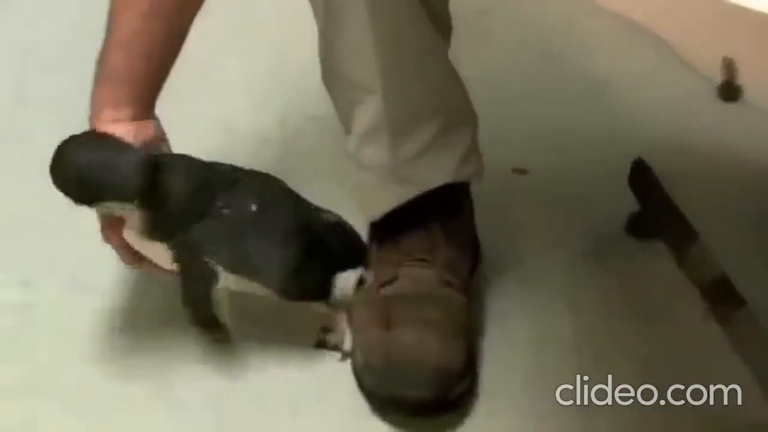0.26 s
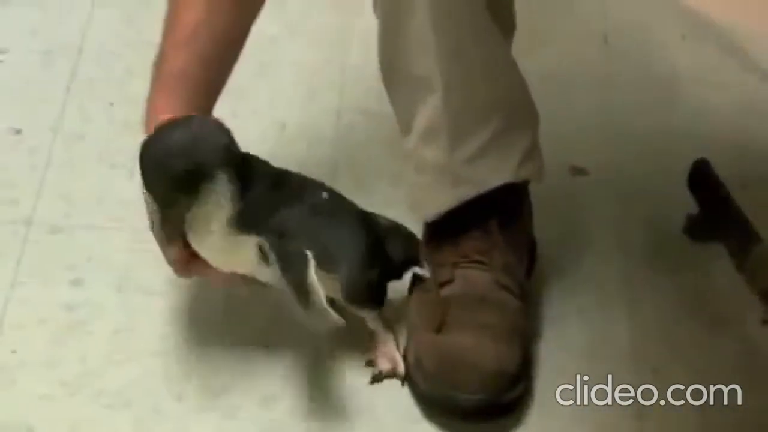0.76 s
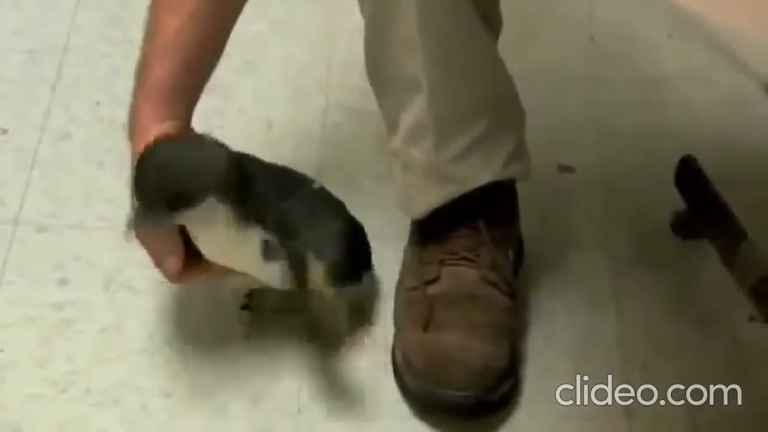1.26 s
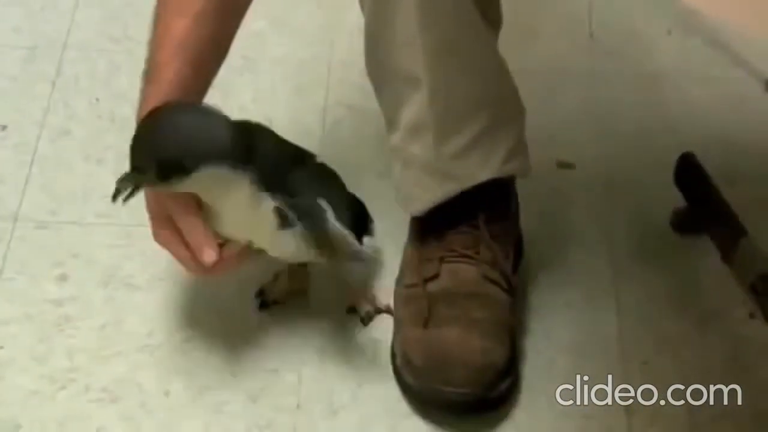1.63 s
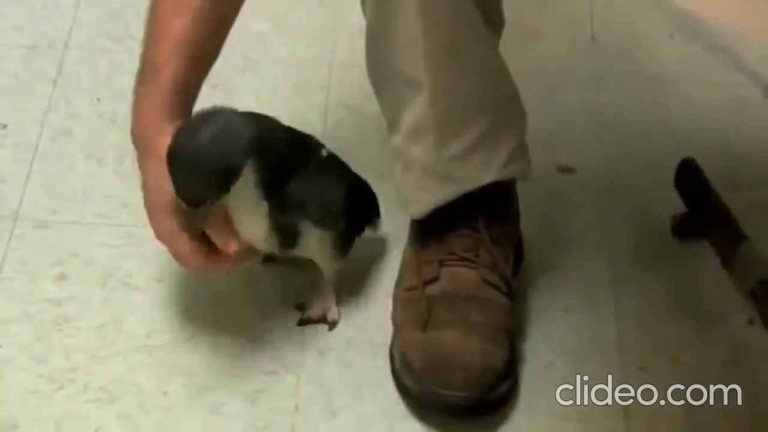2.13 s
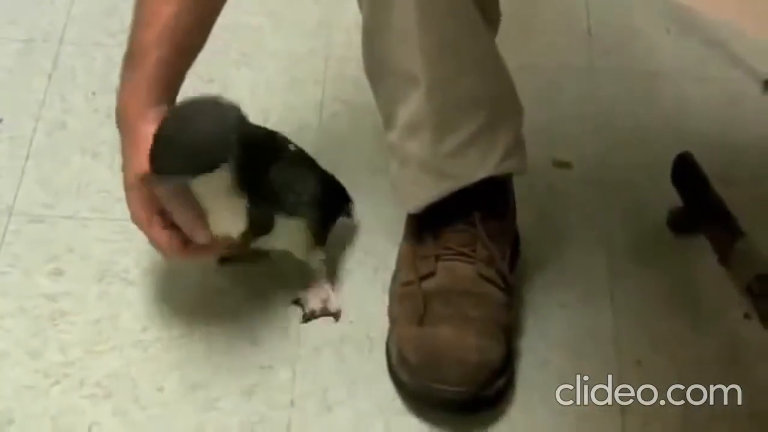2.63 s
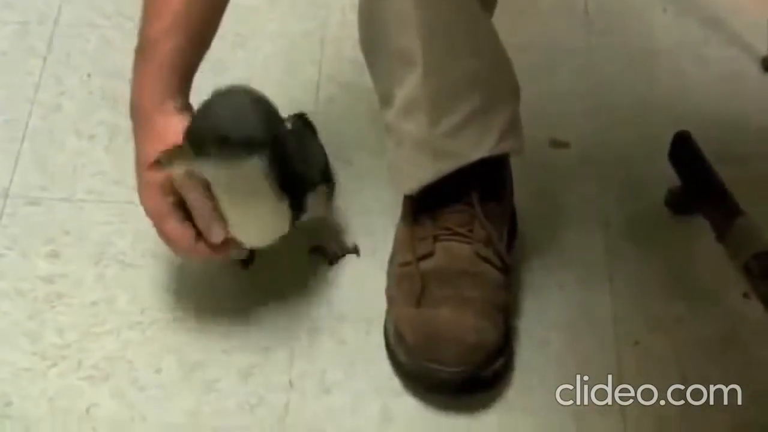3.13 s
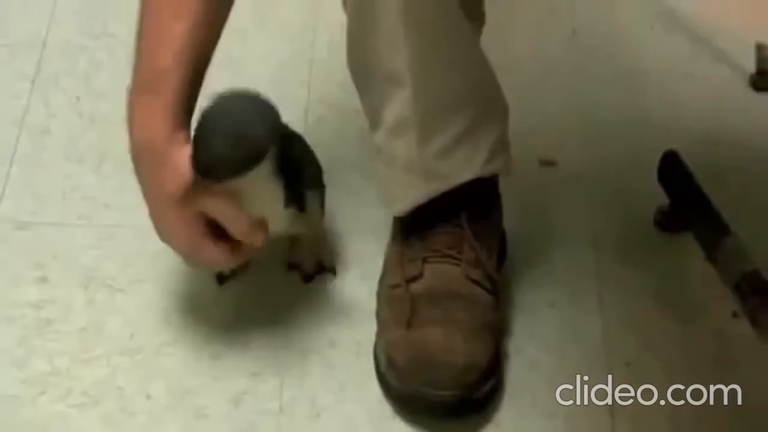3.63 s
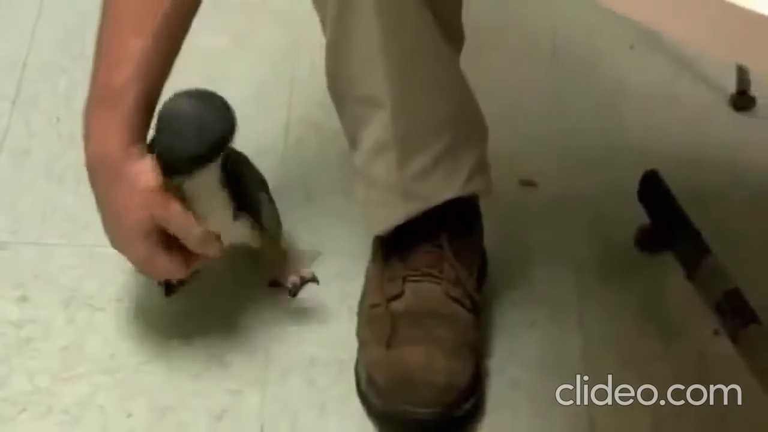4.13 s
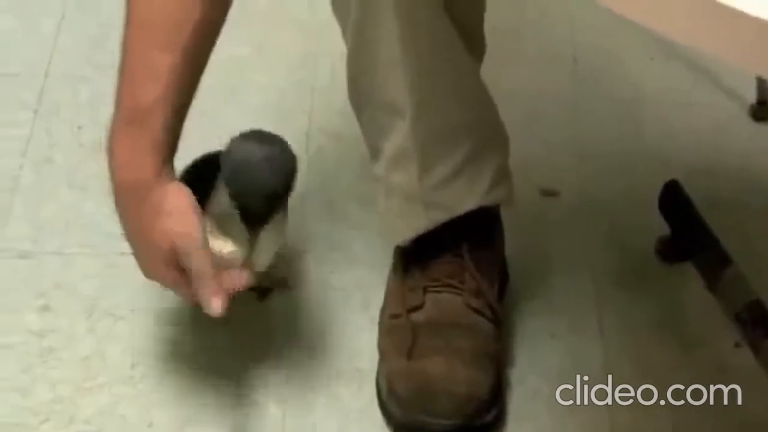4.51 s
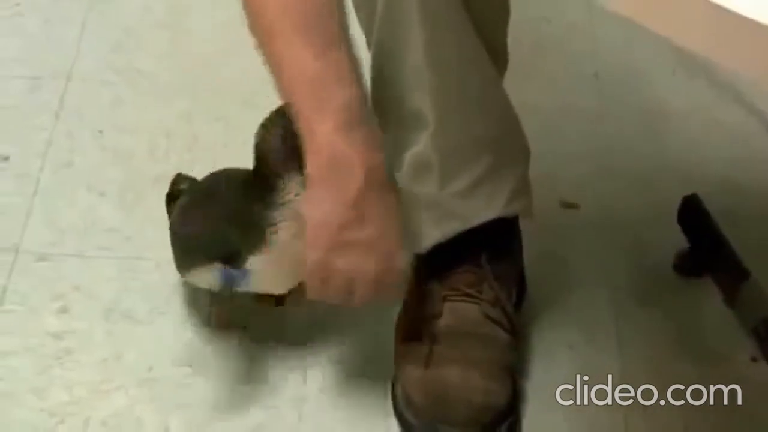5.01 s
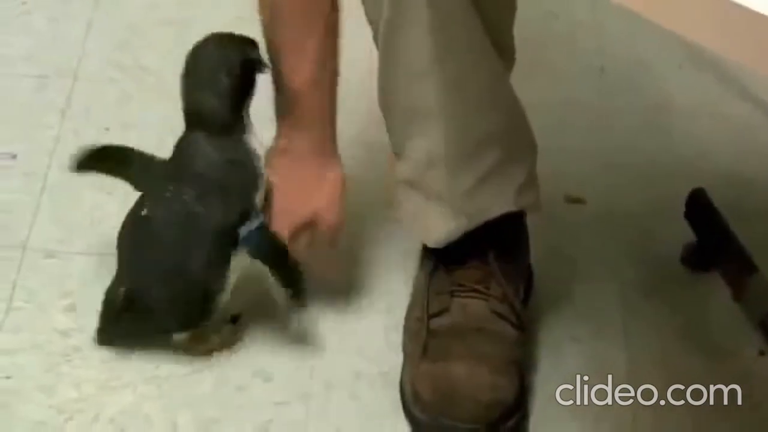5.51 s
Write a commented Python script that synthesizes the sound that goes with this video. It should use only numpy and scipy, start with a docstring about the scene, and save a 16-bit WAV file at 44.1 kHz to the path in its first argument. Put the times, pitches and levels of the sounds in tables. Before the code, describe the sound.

One small penguin brays close to a stereo microphone in a quiet, reverberant room with a hard floor. It begins at once on a loud, whistling squeal around 1300 Hz, fading by 0.25 s. From 0.2 to 1.8 s a hoarse growl swells and rises from about 290 to 450 Hz, then sinks, fluttering rapidly, with rasping hiss and brief brighter flares. Low, rough catches at 1.8 s break upward into a piercing squeal until 2.6 s, crossed by tiny higher whistled chips. A steadier growl near 380 Hz runs from 2.7 to 4.4 s. Another low catch leads to a wavering squeal, 4.5 to 5.05 s, sliding down at its end. From 5.1 s a weak, breathy growl stirs, then swells until the abrupt cut near 5.75 s. Faint floor ticks fall around 0.5, 1.1 and 5.35 s. Low ventilation rumble continues throughout, ducked by gain control around the loud calls.

```python
"""A small penguin brays close by on a hard floor in a quiet, echoing room.
It opens on a held squeal, then growls and squeals by turns, ending on a growl that swells until the cut.
Growls are fluttering, frayed partials with hiss; squeals a strong whistled fundamental with weak overtones.
Short low catches lead into the later squeals, whistled chips cut across the calls and the floor ticks.
Ventilation rumble lies under it all; gain control ducks everything around the loud calls.
"""
import sys
import numpy as np
from scipy import signal
from scipy.fft import rfft, irfft
from scipy.io import wavfile
from scipy.ndimage import uniform_filter1d

SR = 44100
rng = np.random.default_rng(int(sys.argv[2]) if len(sys.argv) > 2 else 0)


def pcm_store(signal):
    """Save signal as 16-bit PCM."""
    levels = np.round(np.clip(np.atleast_2d(signal), -1, 1) * 32767)
    wavfile.write(sys.argv[1], SR, levels.astype(np.int16).T)


N = 254016

# One curve an out-breath: [t/s, effort level/dB, pitch f/Hz]
GROWL_CURVES = [
    [(0.2, -56, 290.1), (0.27, -37.5, 283.7), (0.44, -33.5, 301.3), (0.47, -24.5, 299.1),
     (0.66, -24.5, 348.5), (0.83, -21.5, 364.2), (0.944, -22.5, 416), (1.08, -19, 398.2),
     (1.24, -19, 458.3), (1.5, -17.5, 411.5), (1.68, -23.5, 390.1), (1.744, -27.5, 342.7),
     (1.79, -42.5, 338.6)],
    [(2.66, -51, 259.1), (2.7, -38.5, 270.3), (2.8, -29.5, 335.8), (2.92, -24.5, 374.5), (3.1, -22, 390.8),
     (3.26, -19, 399.3), (3.38, -21.5, 391.5), (3.62, -21.5, 378.8), (3.77, -19.5, 389.9),
     (4.2, -22.5, 372.8), (4.33, -28.5, 360.1), (4.42, -52, 322.2)],
    [(5.12, -65, 298.3), (5.23, -45, 304.3), (5.3, -40, 303.8), (5.46, -39, 308.7), (5.535, -45.5, 293.8),
     (5.55, -35.5, 304.1), (5.62, -31.5, 322.7), (5.72, -25, 333.5), (5.76, -22.5, 342.4)],
]
# One row an out-breath: [mean flutter f/Hz, body shake f/Hz, t/s of a shake peak]
GROWL_FLUTTERS = [(46, 10.134, 1.45), (44.12, 15, 4.7), (33.99, 11, 5.69)]
# Throat resonances that shape the growl: [f/Hz, relative level/dB]
GROWL_THROAT = [(200, -17), (300, 3.5), (420, -1.5), (580, -3.5), (780, 2.5), (1000, -7), (1250, -4),
                (1700, -16.5), (2200, -26.5), (3000, -51.5), (4500, -57.5)]
# A higher growl is pressed harder: its upper partials gain level around a middle pitch
MIDDLE_HZ, UPPER_DB, UPPER_DB_PER_OCTAVE = 400, -1.5, 40
THROB, THROB_PITCH = .62, .02  # flutter depth in level (0-1) and as a share of pitch
WEAK_BELOW_DB, WEAK_WOBBLE = -22, .003  # share of pitch wobble added per dB of effort below this


def growl(rows, hiss_rows, flutter_hz, shake_hz, shake_s):
    """Unsteady membranes: throbbing partials on a fluttering pitch, and air puffing through each cycle."""
    t, (effort_db, hz) = curves(rows)
    n = len(t)
    upper_db = UPPER_DB + UPPER_DB_PER_OCTAVE * np.log2(hz / MIDDLE_HZ) + flares(t)
    lost_db = np.maximum(WEAK_BELOW_DB - effort_db, 0)

    beat = np.cumsum(flutter_hz * (1 + 0.1212 * wander(n, 7.744))) / SR  # a slow flutter chops the growl
    hz = (hz + flares(t, 3)) * (1 + THROB_PITCH * np.sin(2 * np.pi * beat))
    slow_wobble = (.011 + WEAK_WOBBLE * lost_db) * wander(n, 25.)
    fast_wobble = .005 * wander(n, 100.)
    turns = np.cumsum(hz * (1 + slow_wobble + fast_wobble)) / SR

    tone = np.zeros(n)
    weak_fray = .05 * np.minimum(lost_db, 12)  # a weak growl frays more
    for k in range(1, 9):
        upper_share = np.clip((k * hz - 500.) / 701.0, 0, 1)
        level = gain_of(read(GROWL_THROAT, k * hz) + upper_db * upper_share)
        # each partial frays into a band, higher ones more
        fray = frayed(n, .3 + .14 * k + weak_fray, 22. + 12 * k)
        # each partial peaks at its own point of the beat
        throbs = 1 + THROB * np.cos(2 * np.pi * (beat + .3 * k))
        partial = fray * np.exp(2j * np.pi * (k * turns + rng.random()))
        tone += level * throbs * partial.real

    puffs = (1.7 + np.exp(-(turns % 1) / 0.58)) * rng.standard_normal(n)
    breath = evened(coloured(puffs, GROWL_THROAT))
    # a weak growl is breathier
    voice = evened(tone) + gain_of(-14 - 0.6 * (effort_db + 20.5)) * breath
    voice = signal.sosfilt(signal.butter(3, 180., "high", fs=SR, output="sos"), voice)
    call = gain_of(effort_db) * voice + rasp(t, puffs, hiss_rows, shake_hz, shake_s)
    return t[0], call * signal.windows.tukey(n, .03)


# The beak opens for a moment and the growl flares brighter and higher:
# [t/s, length/s, lift of the upper partials level/dB, pitch lift f/Hz]
BEAK_FLARES = [(0.662, 0.0335, 16.5, 22.5), (0.854, 0.0585, 7, 22.17), (0.946, 0.0628, 12.5, 9.33),
               (1.196, 0.0356, 2.5, 21.12), (1.556, 0.068, 6.5, 8.4), (1.542, 0.032, 2.5, 24),
               (1.632, 0.0642, 10, 2.85), (3.149, 0.0784, 2.5, 8.57), (3.228, 0.0394, 3.5, 14.4),
               (3.411, 0.1338, 6.5, 4), (3.761, 0.049, 2.5, 20.2), (3.961, 0.081, 5, 14.23),
               (4.127, 0.0517, 5, 2.39)]


def flares(t, column=2):
    """Each opening lifts brightness (column 2) or pitch (column 3) in a smooth bump; overlaps add."""
    return sum(row[column] * np.exp(-((t - row[0]) / (row[1] / 2)) ** 2) for row in BEAK_FLARES)


# One curve an out-breath, nominal band levels: [t/s, low band level/dB, middle level/dB, upper level/dB]
RASP_CURVES = [
    [(0.26, -63.5, -71, -62), (0.335, -66.5, -70, -66), (0.378, -52.5, -59.5, -53),
     (0.44, -63.5, -64.5, -60.5), (0.468, -56, -57.5, -53), (0.588, -49, -50, -47),
     (0.914, -60, -51, -51.5), (0.932, -56, -54, -41.5), (1.092, -55.5, -48, -49.5),
     (1.11, -45, -45.5, -43), (1.204, -57, -46, -37), (1.406, -48, -44, -42), (1.444, -50, -42, -37),
     (1.742, -57, -51.5, -51), (1.78, -70, -56.5, -50.5)],
    [(2.75, -63.5, -66, -61), (2.802, -48, -51.5, -52.5), (2.826, -52.5, -61, -57.5),
     (2.95, -57.5, -54, -56.5), (3.112, -51.5, -48.5, -46), (3.548, -50, -43, -52.5),
     (3.606, -53.5, -47, -60.5), (3.758, -49.5, -43, -52), (4.046, -56.5, -47, -48),
     (4.346, -63.5, -62.5, -58.5), (4.36, -74.5, -79.5, -69)],
    [(5.5, -80, -75.5, -78.5), (5.535, -78, -76, -77), (5.556, -80, -57.5, -68.5), (5.586, -63.5, -57, -68),
     (5.624, -64.5, -58, -61), (5.664, -65.5, -55, -64), (5.75, -61, -61, -55.5)],
]
# One row a band: [lower edge f/Hz, upper edge f/Hz]
RASP_BANDS = [(2000, 4800), (4800, 6250), (6250, 9900)]
# Colour of rushing air, in the rasp and in the squeal: [f/Hz, relative level/dB per Hz]
HISS_COLOUR = [(2000, -1.5), (3000, -12), (4500, -11.5), (4900, -16), (5500, -5.5), (6100, -10), (6900, -4),
               (7600, -4.5), (8300, -6), (8900, -17.5), (9800, -47.5)]
SHAKE_DB = 2.2  # body shake on the hiss, either way


def rasp(t, puffs, rows, shake_hz, shake_s):
    """Puffed air hisses in three bands that swell apart; the beating flippers shake the airflow."""
    s, *levels_db = np.transpose(rows)
    hiss, out = coloured(puffs, HISS_COLOUR), 0
    shake_db = SHAKE_DB * np.cos(2 * np.pi * shake_hz * (t - shake_s))
    for edges, db in zip(RASP_BANDS, levels_db):
        band_filter = signal.butter(4, edges, "band", fs=SR, output="sos")
        band = evened(signal.sosfilt(band_filter, hiss))
        flicker_db = 2.76 * wander(len(t), 32.0) - 2.0
        out = out + band * gain_of(np.interp(t, s, db, left=-75) + shake_db + flicker_db)
    return out


# One curve a held squeal:
# [t/s, effort level/dB, pitch f/Hz, high overtones over effort level/dB before a 7 dB cut]
SQUEAL_CURVES = [
    [(0.0, -8, 1376, -24), (0.042, -13.5, 1293, -28.5), (0.084, -18.5, 1386, -18), (0.1, -7, 1363, -31.5),
     (0.125, -23.5, 1312, -14.5), (0.145, -16, 1300, -25), (0.175, -22, 1222, -26),
     (0.19, -29.5, 1295, -24), (0.21, -27, 1296, -25.5), (0.24, -42.5, 1310, -24)],
    [(1.878, -12, 1291, -30), (1.905, -10.5, 1305, -16.5), (1.946, -10, 1303, -11.5),
     (2.01, -8.5, 1352, -18), (2.06, -10, 1374, -24.5), (2.13, -7, 1361, -26.5), (2.222, -14, 1424, -24.5),
     (2.25, -29, 1403, -12.5), (2.29, -9, 1392, -33), (2.42, -10, 1311, -28), (2.524, -11, 1241, -36),
     (2.555, -17, 1119, -20.5), (2.6, -35.5, 1205, -20.5)],
    [(4.487, -8, 1256, -26), (4.547, -12, 1101, -30), (4.607, -8.5, 1293, -19), (4.635, -7.5, 1160, -43),
     (4.693, -8, 1336, -19.5), (4.765, -7.5, 1240, -28), (4.798, -16, 1330, -12),
     (4.83, -11.5, 1305, -19.5), (4.845, -8, 1242, -24.5), (4.91, -8, 1218, -33.5),
     (4.977, -12, 1123, -41.5), (5.06, -38.5, 1106, -19.5)],
]
# One row a held squeal: [upper throat resonance from f/Hz, to f/Hz,
# low overtones over effort level/dB, roughness from (0-1), roughness to (0-1)]
SQUEAL_COLOURS = [(8450, 7050, -16, 0.7, 0.76), (5120, 6973, -24.5, 0.6, 0.42),
                  (6900, 7070, -23, 0.55, 0.3)]
# Throat resonances that shape the overtones: [f/Hz, level/dB]
SQUEAL_THROAT = [(1500, 9.5), (2500, -5.5), (3300, -14), (3800, -18), (4200, -15), (4600, -13.5),
                 (5300, -0.5), (6500, -5.5), (8000, -3.5), (9500, -11.5)]
RING_GLIDE_S = 0.2117  # the resonance and the roughness settle over this time
TEAR, TEAR_HZ = .55, 80  # how far and how fast roughness tears the overtones
EDGE_HZ = 9950  # top of the audible band, for the overtones and for the final band limit


def squeal(rows, ring_from_hz, ring_to_hz, low_db, rough_from, rough_to, tight_db=0):
    """A taut membrane whistles a strong fundamental; weak overtones ring in the upper throat."""
    t, (effort_db, hz, high_db) = curves(rows)
    n = len(t)
    settled = np.clip((t - t[0]) / RING_GLIDE_S, 0, 1)
    ring_hz = ring_from_hz + (ring_to_hz - ring_from_hz) * settled
    rough = rough_from + (rough_to - rough_from) * settled ** 2
    hz = hz * (1 + .004 * wander(n, 30.) + .029 * rough * wander(n, 150.))
    turns = np.cumsum(hz) / SR

    overtones = np.zeros(n)
    for k in range(2, 13):
        # tightness favours the octave over the higher overtones
        tilted_db = low_db + tight_db * (-1 if k > 2 else .5)
        level_db = read(SQUEAL_THROAT, k * hz) + np.where(k * hz < 4500, tilted_db, high_db - 7.0)
        flicker_db = 3.46 * wander(n, 36.0)
        ring_db = 11.67 * np.exp(-((k * hz - ring_hz) / 1211.0) ** 2)
        torn = frayed(n, TEAR * rough, TEAR_HZ) * np.exp(2j * np.pi * k * turns)
        overtones += gain_of(level_db + flicker_db + ring_db) * (k * hz < EDGE_HZ) * torn.real

    air = gain_of(high_db - 21.5) * rough * evened(coloured(rng.standard_normal(n), HISS_COLOUR))
    whistle = np.sqrt(2) * np.cos(2 * np.pi * turns)
    null_db = nulls(t)
    # overtones and air dip less in a null
    voice = gain_of(null_db) * whistle + gain_of(0.4 * null_db) * (overtones + air)
    shimmer = 1 + .5 * rough * wander(n, 70.)
    edges = np.clip(np.minimum(t - t[0], t[-1] - t) / 0.0017, 0, 1)
    return t[0], gain_of(effort_db) * shimmer * voice * edges


# Echoes briefly cancel the squeal's fundamental: it fades, then returns quickly:
# [deepest t/s, depth level/dB, fade length/s]
ECHO_NULLS = [(.032, -14, 0.01), (0.138, -14.5, 0.0098), (2.279, -9, 0.044), (2.395, -16.5, 0.022),
              (2.441, -14.5, 0.022), (4.566, -12, 0.029), (4.959, -18.5, 0.017)]


def nulls(t):
    """Each null deepens along a straight dB ramp and clears within 4 ms; returns the level change in dB."""
    lost_db = 0
    for s, db, fade in ECHO_NULLS:
        fading, returning = 1 + (t - s) / fade, 1 - (t - s) / .004
        lost_db = lost_db + db * np.clip(np.minimum(fading, returning), 0, 1)
    return lost_db


# The in-breath catches in lower registers before the squeal holds:
# [start t/s, length/s, effort level/dB, pitch from f/Hz, pitch to f/Hz, roughness (0-1),
# tightness level/dB: half is added to the octave, all is taken from higher overtones under 4500 Hz]
REGISTER_CATCHES = [(1.795, 0.0422, -13.5, 865.9, 915.4, 0.66, 6),
                    (1.822, 0.056, -18, 1154, 1212, 0.89, 7.5), (1.84, 0.08, -25, 899.6, 924, 0.97, 1),
                    (4.427, 0.075, -18.5, 787.7, 817.8, 0.42, -1)]
CATCH_RISE, CATCH_SOFT_DB = 0.34, -7  # share of the length spent swelling, and the softer start
CATCH_HIGH_DB, CATCH_LOW_DB, CATCH_RING_HZ = -26, -18.5, 6840  # overtones and resonance, as in a squeal


def catch(start, length, effort_db, from_hz, to_hz, rough, tight_db):
    """The same membrane in a lower register: a short squeal that swells, then slides up."""
    rows = [
        (start, effort_db + CATCH_SOFT_DB, from_hz, CATCH_HIGH_DB),
        (start + CATCH_RISE * length, effort_db, from_hz, CATCH_HIGH_DB),
        (start + length, effort_db, to_hz, CATCH_HIGH_DB),
    ]
    return squeal(rows, CATCH_RING_HZ, CATCH_RING_HZ, CATCH_LOW_DB, rough, rough, tight_db)


# The other side of the voice box chips in: [middle t/s, mean pitch f/Hz, level/dB, length/s]
VOICE_CHIPS = [(0.083, 1555, -19, 0.066), (0.142, 1638, -43.5, 0.033), (2.056, 1505, -10.5, 0.026),
               (2.071, 1639, -20.5, 0.024), (2.124, 1554, -19.5, 0.013), (2.158, 1641, -13.5, 0.025),
               (2.223, 1539, -12.5, 0.038), (2.249, 1591, -12.5, 0.04), (2.359, 1588, -23, 0.035),
               (2.448, 1495, -21, 0.017), (2.566, 962.3, -26.5, 0.022)]


def chip(s, hz, db, length):
    """A short whistle on an unsteady pitch, with weak partials one and two octaves up."""
    n = round(length * SR)
    turns = np.cumsum(hz * (1 + 0.034 * wander(n, 65.0))) / SR
    octaves = np.cos(4 * np.pi * turns) + np.cos(8 * np.pi * turns)
    tone = np.cos(2 * np.pi * turns) + gain_of(-24.5) * octaves
    return s - length / 2, gain_of(db) * tone * signal.windows.tukey(n, .6)


# Claws and flippers tick on the floor: [t/s, nominal starting level/dB]
FLOOR_TICKS = [(0.481, -56.5), (0.555, -59), (1.115, -40), (5.3562, -47.5)]


def tick(db):
    """A hard contact: a dry noise burst, brightened, that dies by 60 dB in 36 ms and is cut before that."""
    t = np.arange(600) / SR
    burst = rng.standard_normal(600) * gain_of(db - 60 * t / 0.036)
    return signal.lfilter([1, -.9], [1], burst)


# Reverberation time: [f/Hz, t60/s]
ROOM_T60 = [(200, .6), (600, .6), (1300, .6), (2500, .45), (8000, .3)]
# Strength of the echoes: [f/Hz, echo over direct level/dB]
ROOM_LEVEL = [(200, 1), (600, -2.5), (1300, -5), (3000, 1.5), (8000, -3.5)]
# Echoes common to left and right: [f/Hz, shared power (0-1)]
ROOM_SHARED = [(200, 1), (600, 0.866), (1300, 0.82), (2500, 0.45), (5000, 0.23), (6500, 0.95), (9000, 0.93)]


def room(x):
    """Direct sound plus sparse echoes of random sign, each band dying at its own speed."""
    taps = np.zeros((2, SR))
    at = np.arange(200, SR - 20, 20) + rng.integers(0, 20, (2, (SR - 201) // 20))
    np.put_along_axis(taps, at, rng.choice([-1., 1.], at.shape), 1)
    hz, t, (a, b) = signal.stft(taps, SR, nperseg=256)
    t60 = read(ROOM_T60, hz)[:, None]
    shared = np.clip(read(ROOM_SHARED, hz), 0, 1)[:, None]
    common, apart = np.sqrt(shared) * a, np.sqrt(1 - shared) * b
    # the divisor evens out the total echo power of long and short decays
    decay = gain_of(read(ROOM_LEVEL, hz)[:, None] - 60 * t / t60)
    fade = decay / np.sqrt(t60 * SR / 20 / np.log(1e6))
    tail = signal.istft(np.array([common + apart, common - apart]) * fade, SR, nperseg=256)[1]
    return x + signal.fftconvolve(x[None], tail, axes=1)[:, :N]


# Colour of the ventilation: [f/Hz, relative level/dB per Hz]
RUMBLE_COLOUR = [(20, -16.5), (60, -9.5), (100, -14.5), (200, -7), (300, -7), (450, -10.5), (1100, -15),
                 (1700, -31), (4000, -35.5), (8000, -37), (9000, -50.5), (9800, -96.5)]
# Left-right likeness of the ventilation: [f/Hz, correlation (0-1)]
RUMBLE_LIKENESS = [(30, .7), (125, .8), (1000, .7), (8000, .8)]
RUMBLE_DB = -42  # mid level of the swell


def rumble():
    """Ventilation: coloured stereo noise, partly alike left and right, with a slow random swell."""
    frames, hz = N // 512 + 5, np.fft.rfftfreq(2048, 1 / SR)
    a, b, c, d = rng.standard_normal((frames, 1025, 4)).T
    same = np.clip(read(RUMBLE_LIKENESS, hz), 0, 1)[:, None]
    left, other = a + 1j * b, c + 1j * d
    right = same * left + np.sqrt(1 - same ** 2) * other
    spectra = np.array([left, right]) * gain_of(read(RUMBLE_COLOUR, hz))[:, None]
    air = evened(signal.istft(spectra, nperseg=2048, noverlap=1536)[1][:, :N])
    return gain_of(RUMBLE_DB + 1.5 * wander(N, 1.5)) * air


def gain_of(db):
    """Turns dB into an amplitude factor."""
    return 10 ** (np.asarray(db) / 20)


def evened(x):
    """Scales a sound to rms 1."""
    return x / np.sqrt(np.mean(x ** 2) + 1e-20)


def read(points, hz):
    """Reads a table over frequency, interpolating on a log scale."""
    f, value = np.transpose(points)
    return np.interp(np.log(hz + 1), np.log(f + 1), value)


def add(mix, s, sound):
    """Lays a sound into the mix at s seconds, cutting it at the end."""
    part = mix[round(s * SR):][:len(sound)]
    part += sound[:len(part)]


def coloured(x, db_points):
    """Filters by a gain curve over frequency."""
    hz = np.fft.rfftfreq(x.shape[-1], 1 / SR)
    return irfft(rfft(x) * gain_of(read(db_points, hz)), x.shape[-1])


def wander(n, hz):
    """Random motion of rms 1, mostly slower than hz."""
    lowpass = signal.butter(2, hz, fs=SR, output="sos")
    return evened(signal.sosfilt(lowpass, rng.standard_normal(n + 4000))[4000:])


def frayed(n, depth, hz):
    """Random level and phase around 1: spreads a partial into a band."""
    return (1 + depth * (wander(n, hz) + 1j * wander(n, hz))) / np.sqrt(1 + 2 * depth ** 2)


def curves(rows):
    """Draws straight lines through rows that start with a time in seconds."""
    s, *columns = np.transpose(rows)
    t = np.arange(s[0], s[-1], 1 / SR)
    return t, [np.interp(t, s, c) for c in columns]


def scene():
    """The penguin and its ticks sound in the room, over the ventilation."""
    near = np.zeros(N)
    for rows, hiss, flutter in zip(GROWL_CURVES, RASP_CURVES, GROWL_FLUTTERS):
        add(near, *growl(rows, hiss, *flutter))
    for rows, colour in zip(SQUEAL_CURVES, SQUEAL_COLOURS):
        add(near, *squeal(rows, *colour))
    for row in REGISTER_CATCHES:
        add(near, *catch(*row))
    for row in VOICE_CHIPS:
        add(near, *chip(*row))
    for s, db in FLOOR_TICKS:
        add(near, s, tick(db))
    return gain_of(0.5) * room(near) + rumble()


# Unequal colour of the two microphone ports: [f/Hz, left over right level/dB]
PORT_LEAN = [(250, 1.14), (600, 2), (1300, 0.25), (2500, 0), (5000, 0), (8000, -1.02)]


def record(dry):
    """Two ports of unequal colour, gain control that ducks fast and recovers slowly, then the band limit."""
    hz, lean_db = np.transpose(PORT_LEAN)
    ports = np.array([coloured(x, np.transpose([hz, side * lean_db / 2])) for x, side in zip(dry, (1, -1))])
    power_db = 10 * np.log10(abs(uniform_filter1d((ports ** 2).mean(0), 1500)) + 1e-12)
    fall = np.arange(N) * 11.63 / SR  # the held peak falls by this many dB a second
    held_db = np.maximum.accumulate(power_db + fall) - fall
    over_db = np.maximum(held_db + 13.5, 0)  # acts above -13.5 dB
    ducked = ports / gain_of(0.6184 * uniform_filter1d(over_db, 400))
    band_limit = signal.firwin(511, EDGE_HZ, window=("kaiser", 9), fs=SR)
    return signal.oaconvolve(ducked, band_limit[None], "same")


dry = scene()
out = record(dry)
pcm_store(out)
```